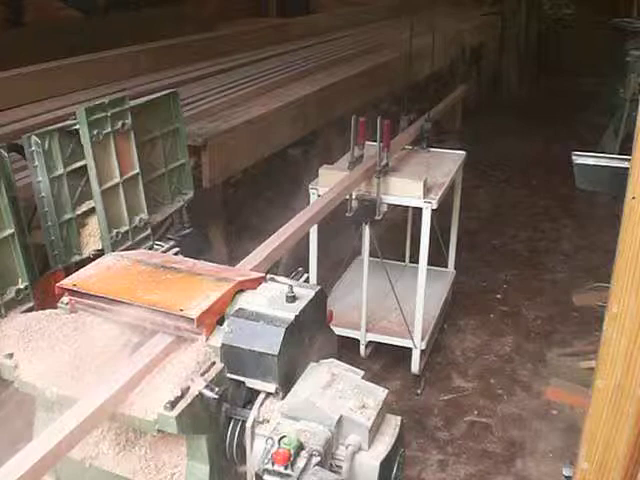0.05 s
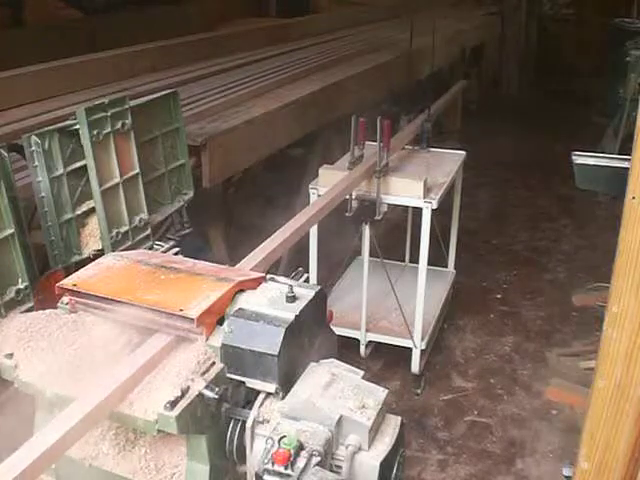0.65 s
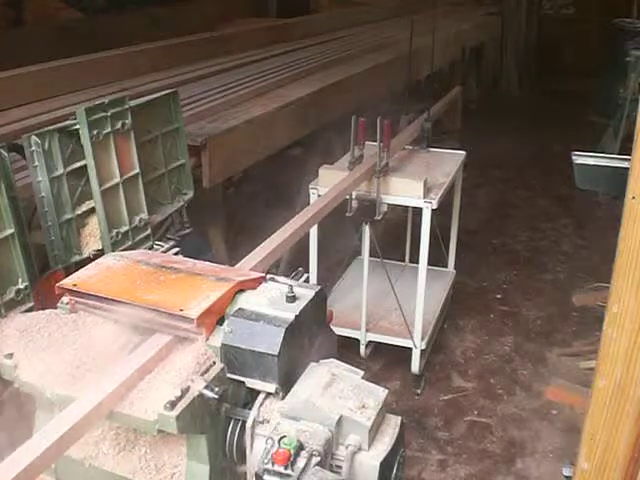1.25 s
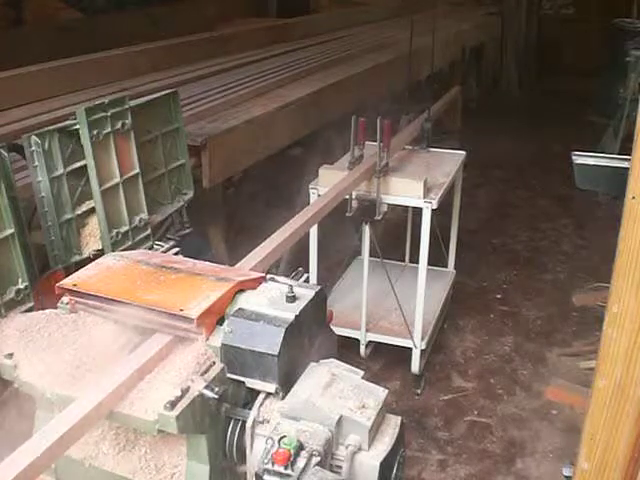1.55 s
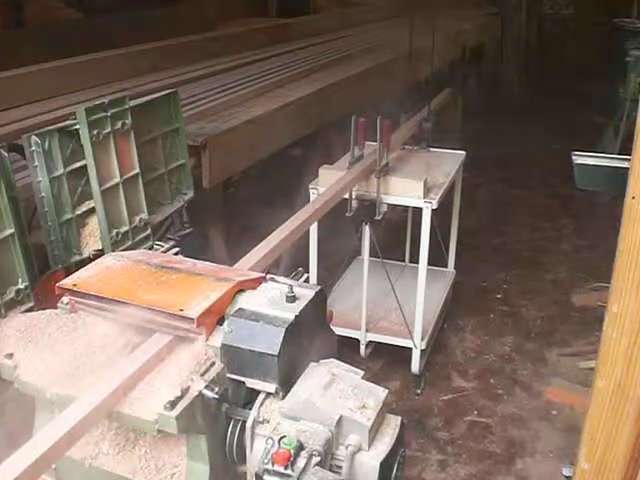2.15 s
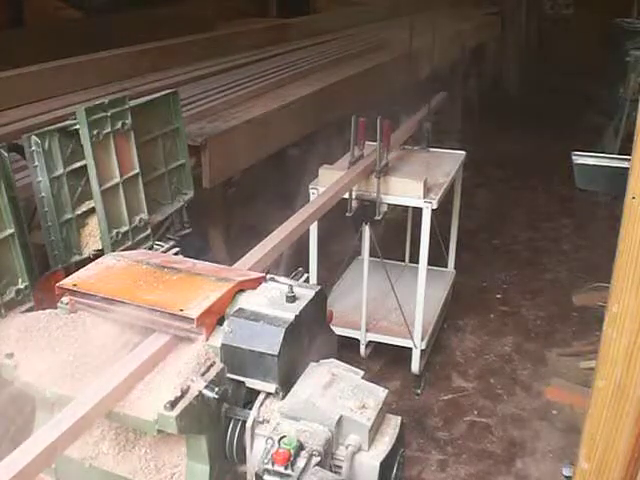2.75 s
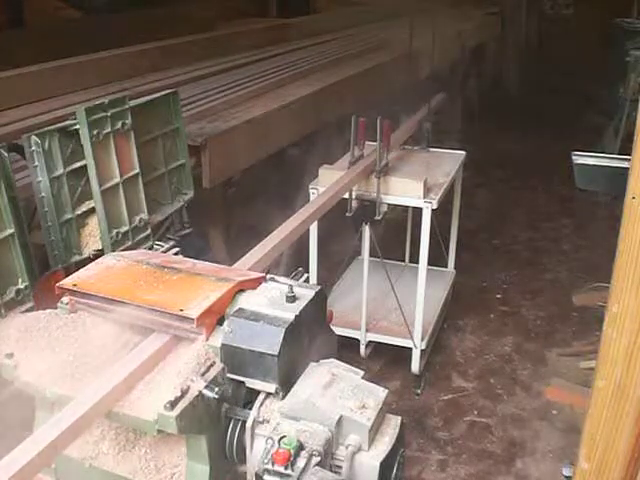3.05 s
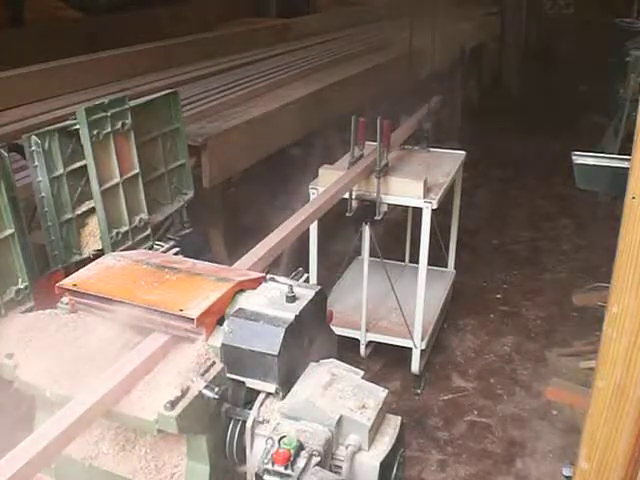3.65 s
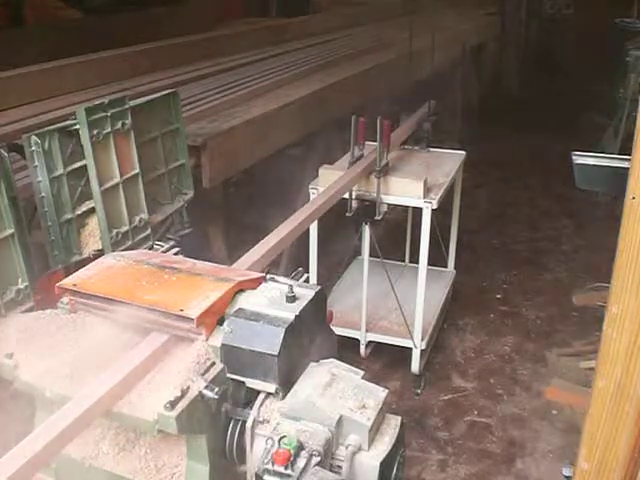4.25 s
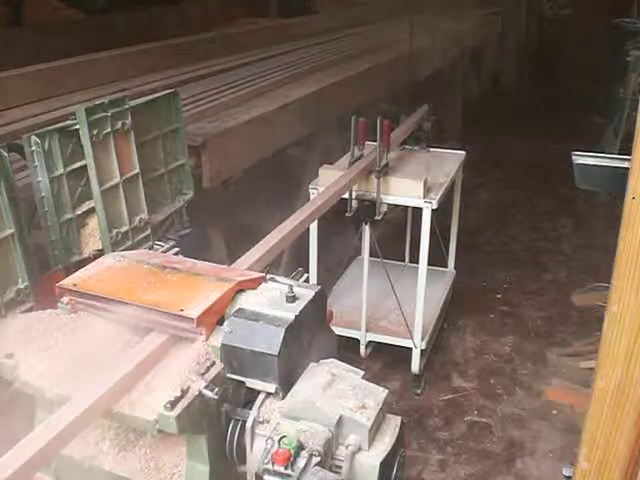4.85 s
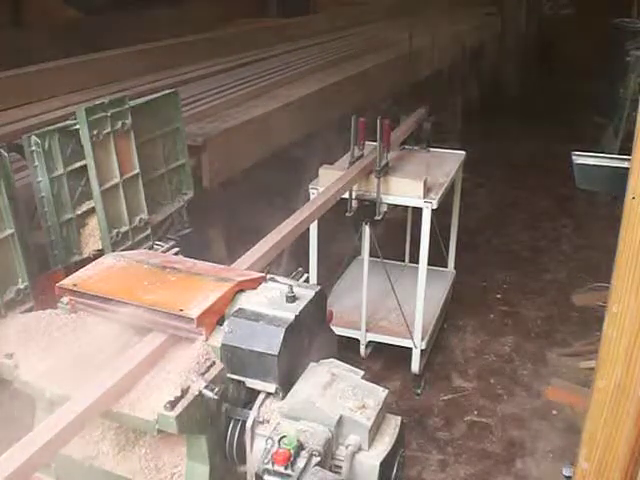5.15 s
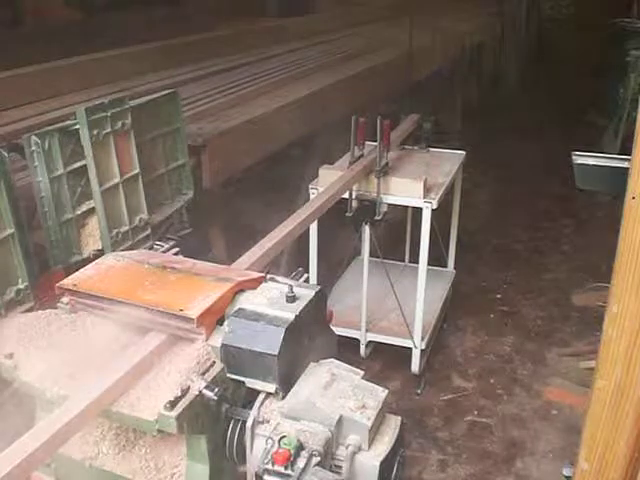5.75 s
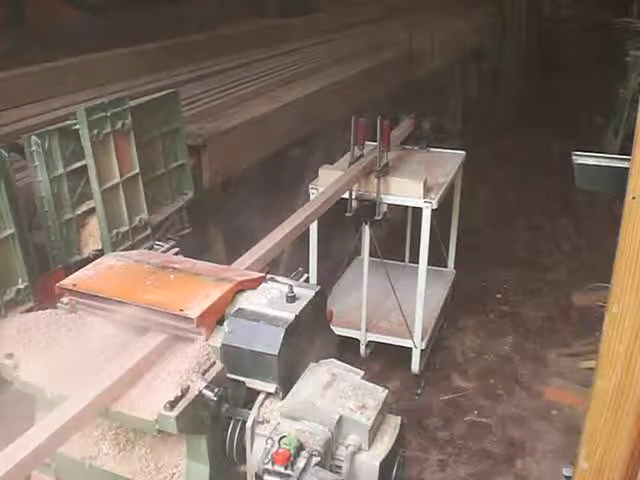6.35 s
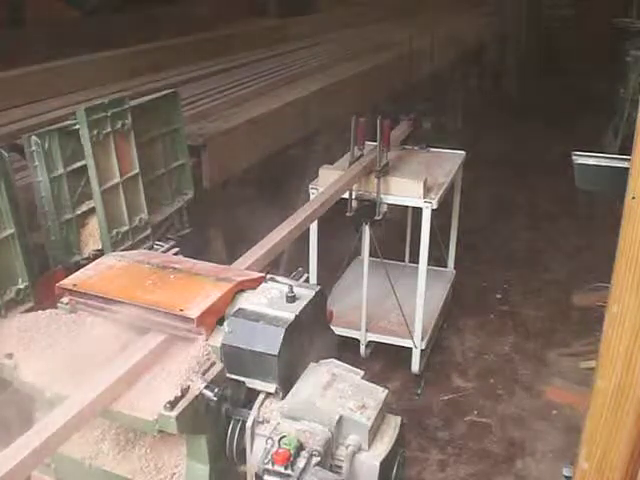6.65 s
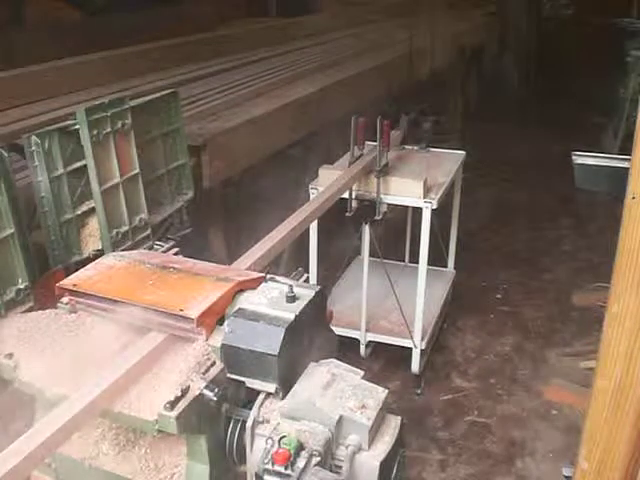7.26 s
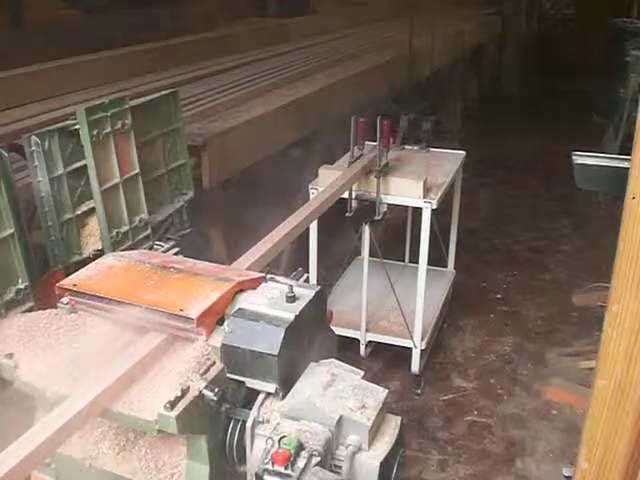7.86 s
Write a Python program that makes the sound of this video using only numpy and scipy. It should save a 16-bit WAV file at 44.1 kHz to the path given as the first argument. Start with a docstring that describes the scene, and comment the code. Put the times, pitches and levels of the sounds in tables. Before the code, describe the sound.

A motorised planer is already cutting a wooden strip at the start, heard from one fixed microphone beside it in a workshop. The rapid knife strikes fuse into a throbbing drone and a high, buzzing whine. Air rushes around the cutter, tearing fibres and flying chips add a bright hiss, and a faint motor hum lies underneath. Within the first second the strip begins to squeal on and off, with a clear, high squeal at about 1 second. Single tones swell and fade within the drone, and rough grain brings brief rasps. Squeals and rasps are strongest around 4 seconds, return in shorter bursts between about 5.3 and 6.2 seconds, and peak again just after 7 seconds. The machine's pitch and overall loudness stay nearly constant, and the cut is still going at the end, at about 8 seconds.

```python
"""A workshop, one fixed microphone beside a running planer; a wooden strip is already feeding through.
From the start the motor hums, air rushes round the two-knife cutter block, and the knife strikes
fuse into a throbbing drone and a buzzing whine, each strike tearing off a burst of chips.
Within the first second the strip starts to squeal on and off, single tones sing out and cross grain rasps.
Squeals and rasps are strongest around 4 s and just after 7 s; the cut runs on to the end."""
import sys
import numpy as np
from scipy import signal
from scipy.fft import rfft, irfft, next_fast_len
from scipy.io import wavfile
from scipy.ndimage import uniform_filter1d

SR = 44100
rng = np.random.default_rng(int(sys.argv[2]) if len(sys.argv) > 2 else 0)


def transcribe(u):
    """Save the signal u as a 16-bit wav file named by the first command-line argument.

    u: samples, shape (n,) or (channels, n), limited to [-1, 1]; the rate is SR.
    q: integer samples, one column per channel.
    """
    v = np.clip(np.atleast_2d(u).T, -1, 1)
    q = np.round(v * 32767).astype(np.int16)
    wavfile.write(sys.argv[1], SR, q)


N = 347949
TIME = np.arange(N) / SR

# Steady tones of the motor and drive. Each row: frequency in Hz, level in dB.
MOTOR_TONES = [(208, -65), (241, -58.5), (257, -53.5), (385, -60), (449.6, -52), (674.7, -62)]
# Air whirled round the block. Each row: frequency in Hz, relative level in dB.
AIR_SPECTRUM = [(25, -39), (70, -12), (170, -10), (260, -10), (410, 2), (470, -3), (600, 0.5), (760, -5),
                (1050, 1), (1800, -2), (2500, -9.5), (4400, -1.5), (7000, -13), (15500, -17)]
# The block sags a little under load. Each row: time in seconds, turns per second.
BLOCK_SPEED = [(0.0, 104.37), (1.16, 104.38), (1.28, 104.04), (1.72, 103.97), (1.9, 104.35), (2.1, 104.0),
               (2.58, 104.33), (3.6, 104.53), (3.7, 104.3), (4.6, 104.59), (5.42, 104.08), (5.52, 104.38),
               (5.82, 104.15), (5.92, 104.42), (6.22, 104.24), (6.72, 104.79), (7.6, 104.23),
               (7.89, 104.55)]
# Slow changes along the strip. Each row: time in seconds, knife bite and chip spray in relative dB.
CUT_LEVELS = [(0.0, -27.5, -34.5), (0.6, -24, -32.5), (0.75, -27.5, -33.5), (1.5, -25.5, -34),
              (2.25, -23.2, -31), (3.75, -26.5, -33.5), (4.65, -25.5, -34.5), (4.8, -26.5, -34.5),
              (5.25, -26, -34), (5.4, -23.5, -34.5), (5.55, -25.5, -34), (5.7, -22.5, -35.5),
              (5.85, -28, -39), (6.0, -25, -35), (6.9, -26.5, -34), (7.89, -26, -34)]
# Tones from both knives alike. Each row: order (multiple of the turning rate), level in dB.
EVEN_ORDERS = [(2, -56), (4, -34), (6, -29.5), (8, -40.5), (10, -32), (12, -35.5), (14, -40), (16, -40.5),
               (18, -33), (20, -36.5), (22, -41), (24, -42), (26, -47), (28, -38.5), (30, -32), (32, -29.5),
               (34, -40), (36, -35), (38, -41), (40, -41), (42, -32.5), (44, -42), (46, -39), (48, -35),
               (50, -38.5), (52, -40.5), (54, -39.5), (56, -36), (58, -37), (60, -35.5), (62, -35),
               (64, -42.5), (68, -47.5), (70, -46), (74, -40.5), (80, -47.5), (84, -42.5), (88, -42),
               (92, -56), (96, -48.5), (102, -46.5), (110, -54.5), (150, -57.5)]
# Tones from one knife standing prouder than the other. Each row: order, level in dB.
ODD_ORDERS = [(1, -48.5), (3, -58.5), (7, -48.5), (9, -52), (11, -45), (15, -47.5), (21, -55), (27, -47.5),
              (31, -43.5), (37, -48.5), (43, -48), (51, -57), (59, -54), (69, -61), (75, -62), (93, -77),
              (151, -64)]
# The drone's two main tones. Each row: time in seconds, orders 4 and 6 in relative dB.
DRONE_LEVELS = [(0.0, -31, -28), (1.5, -35.5, -30), (2.55, -36.0, -26.9), (2.7, -41, -28),
                (3.75, -32.5, -28), (4.65, -30.5, -30.5), (5.7, -30, -29.5), (5.85, -33, -33),
                (6.45, -30, -31), (7.89, -39, -30.5)]
# Those two tones beat. Each row: order, time of one dip in seconds, depth 0-1 at mean level.
DRONE_BEATS = [(4, 1.003, 0.16), (6, 2.146, 0.05)]
# Fibres tearing. Each row: frequency in Hz, relative level in dB.
TEARING_SPECTRUM = [(800, -15.5), (2500, -1), (3300, -5.5), (4000, -6), (4500, -30), (5300, -19), (6200, 1),
                    (7200, -13), (7800, -4.5), (9700, -6.5), (15500, -7.5)]
# Chips spraying over the bed. Each row: frequency in Hz, relative level in dB.
SPRAY_SPECTRUM = [(7000, -33), (11000, 0), (15500, -1)]
# The strip squeals. Each row: middle and half length in seconds, rise in dB, pitch it pulls to in Hz.
STRIP_SQUEALS = [(.17, 0.061, 3, 3300), (0.603, .08, 2.5, 3340), (1.042, 0.15, 7.5, 3180),
                 (1.73, 0.14, 2, 3280), (2.587, 0.11, 3.5, 3260), (2.88, 0.12, 3.5, 3440),
                 (3.824, 0.097, 7, 3000), (4.02, 0.15, 7, 2990), (4.24, 0.15, 5, 3280),
                 (4.62, 0.088, 4.5, 3120), (5.413, 0.12, 4, 3180), (5.79, 0.13, 6.5, 3160),
                 (6.21, .055, 6, 3150), (6.53, 0.07, 1, 3320), (6.95, 0.072, 2, 3220),
                 (7.38, 0.17, 8.5, 3180), (7.776, 0.14, 4.7, 3100)]
# Single tones sing out as the strip moves on.
# Each row: middle and half length in seconds, order, rise in dB.
TONE_FLARES = [(.45, 0.28, 12, 5.5), (.8, 0.2, 18, 6.5), (1.55, .13, 18, 5.5), (1.95, 0.99, 48, 5),
               (2.15, 0.17, 18, 8.5), (2.198, 0.19, 20, 6.5), (2.385, 0.2, 12, 7), (2.42, 0.34, 8, 6.5),
               (2.65, 0.22, 42, 3), (3.38, 0.21, 20, 9.5), (3.81, .33, 18, 11.5), (3.84, .1, 16, 9),
               (3.88, 0.26, 20, 9), (3.954, .35, 10, 3), (5.166, 0.69, 12, 6.5), (5.204, 0.35, 20, 9),
               (5.38, .08, 48, 5), (5.503, 0.27, 18, 6), (5.646, 0.083, 20, 8), (6.4, 1, 20, 6.5),
               (6.55, 0.077, 36, 6), (4.95, 0.36, 8, 5), (7.13, 0.14, 8, 6), (7.147, 0.61, 18, 8.5),
               (7.8, .25, 20, 6.5)]
# Cross grain rasps; soft wood (below 0) cuts quietly.
# Each row: middle and half length in seconds, rasp in dB, of which each layer takes a share.
GRAIN_PATCHES = [(0.502, 0.079, 0.5), (1.31, 0.087, 0.8), (1.47, .06, -1.8), (1.647, 0.077, 2),
                 (2.56, .08, 0.9), (3.404, 0.06, 1.5), (3.818, 0.12, 3), (4.237, 0.11, 2), (5.31, 0.063, 3),
                 (5.455, 0.044, -2), (6.16, 0.054, 1.5), (6.753, .07, -0.5), (7.202, 0.1, 4),
                 (7.78, .05, 1.5)]

SQUEAL_HZ, SQUEAL_WIDTH_HZ = 3170, 500  # the strip's resonance
ECHO_S = .00066  # the machine bed throws each strike back


def amp(db):
    """Decibels to gain."""
    return 10 ** (np.asarray(db) / 20)


def unit(x):
    """Scales to rms 1."""
    return x / np.sqrt(np.mean(abs(x) ** 2) + 1e-20)


def relative(db):
    """A level curve in dB, relative to its mean power."""
    return db - 10 * np.log10(np.mean(amp(db) ** 2))


def curves(rows):
    """Each column of a timed table, at every sample."""
    times, *columns = np.transpose(rows)
    return [np.interp(TIME, times, column) for column in columns]


def bump(middle_s, half_s):
    """A slightly flat-topped bell that reaches 1 at middle_s."""
    return np.exp(-np.minimum(abs((TIME - middle_s) / half_s), 10) ** 2.3)


def wander(rate_hz):
    """A smooth random curve of rms 1 that changes at about the given rate."""
    hz = np.fft.rfftfreq(2048, TIME[-1] / 2048)
    slow = irfft(rfft(rng.standard_normal(2048)) / (1 + (hz / rate_hz) ** 2))
    return np.interp(TIME, np.linspace(0, TIME[-1], len(slow)), unit(slow))


def colour(x, spectrum):
    """Gives x a spectrum, at rms 1."""
    size = next_fast_len(N)
    hz, db = np.transpose(spectrum)
    gain = amp(np.interp(np.log(np.fft.rfftfreq(size, 1 / SR) + 1), np.log(hz), db))
    return unit(irfft(rfft(x, size) * gain, size)[:N])


def order_db(order):
    """Base level of one multiple of the turning rate."""
    return np.interp(order, *np.transpose(ODD_ORDERS if order % 2 else EVEN_ORDERS))


def motor_hum(waver_db=2, drift_rad=0.32):
    """Faint wavering tones of the motor and drive, underneath the cut."""
    hum = np.zeros(N)
    for hz, db in MOTOR_TONES:
        level = amp(db + waver_db * wander(5.8))
        hum += level * np.cos(2 * np.pi * hz * TIME + drift_rad * wander(4))
    return np.sqrt(2) * hum


def air_rush(turns, bite, rasp, level_db=-31.5, throb=0.21, gust_db=0.44):
    """Air and shavings pulse as each knife passes the table lip, louder in cross grain."""
    pulse = 1 + throb * np.cos(4 * np.pi * turns)
    rush = colour(rng.standard_normal(N) * pulse, AIR_SPECTRUM)
    return rush * amp(level_db + 0.4 * bite + 0.85 * rasp + gust_db * wander(7.5))


def knife_drone(turns, bite, swells, waver_db=3, tremble_db=0.91, flutter_rad=0.075):
    """The low orders of the strikes, their phases scrambled by the room on the way to the microphone."""
    drone = np.zeros(N)
    for order in range(1, 25):
        if order in swells:
            swell = swells[order]
        else:  # the rest follow the bite and order 6
            swell = 0.85 * (bite + swells[6]) / 2 + waver_db * min(order / 14, 1) * wander(0.62)
        level = amp(order_db(order) + swell + tremble_db * wander(18))
        drone += level * np.cos(2 * np.pi * (order * turns + rng.random()) + flutter_rad * wander(14))
    return np.sqrt(2) * drone


def strip_resonance(hz):
    """How far a frequency lies inside the strip's resonance, 0-1."""
    return 1 / (1 + (abs(hz - SQUEAL_HZ) / SQUEAL_WIDTH_HZ) ** 4)


def knife_whine(turns, bite, chips, squeal, centre_hz, swells,
                echo=0.91, echo_cutoff_hz=9000, crisp_hz=9000, focus_hz=200, waver_db=1.52):
    """The high orders bunch into a short rasp at each strike, with its echo off the bed."""
    whine = np.zeros(N)
    turn_hz = np.mean(np.array(BLOCK_SPEED)[:, 1])
    drifts = [wander(1.4) + 0.27 * wander(16) for _ in range(24)]
    for order in range(25, 153):
        hz = order * turn_hz
        ring = strip_resonance(hz)
        treble = 1 / (1 + (crisp_hz / hz) ** 6)
        bounce = 1 + echo / (1 + (hz / echo_cutoff_hz) ** 4) * np.exp(-2j * np.pi * hz * ECHO_S)
        # the strip's ringing and the knife's travel through the wood draw the strike out
        ring_lag = np.arctan((hz - SQUEAL_HZ) / SQUEAL_WIDTH_HZ) - np.pi / 2
        travel_phase = 0.24 * ((hz - crisp_hz) / SQUEAL_HZ) ** 2
        # room paths shift each partial's level and phase as the wood moves
        drift_a, level_drift, drift_b = (drifts[i] for i in rng.permutation(len(drifts))[:3])
        scatter = (0.6 * (1 - treble) + 0.38 * treble) * (drift_a + drift_b) / np.sqrt(2)
        phase = np.angle(bounce) - ring_lag + travel_phase + scatter
        cut_db = (1 - treble) * bite + treble * chips + waver_db * level_drift
        swell = ring * squeal + (1 - ring) * cut_db
        if ring > .1:  # the resonance slides and favours the nearest partial
            favour = -10 * np.log10(1 + ((hz - centre_hz) / focus_hz) ** 2)
            swell += ring * (favour - favour.mean())
        level = amp(order_db(order) + swells.get(order, swell))
        whine -= level * np.cos(2 * np.pi * order * turns + phase)
    return np.sqrt(2) * whine


def tearing_fibres(turns, bite, chips, squeal, level_db=-31.5, spray_db=-40, decay=0.072, echo=0.56):
    """Each strike tears fibres: a burst of noise and its duller echo, over a spray of flying chips."""
    age = (2 * turns + .02) % 1  # age and decay are in strike intervals
    bursts = np.exp(-age / decay) * rng.standard_normal(N)
    bounced = uniform_filter1d(np.interp(TIME - ECHO_S, TIME, bursts), size=3)
    hiss = np.sqrt(0.041) * rng.standard_normal(N)
    tearing = colour(bursts + echo * bounced + hiss, TEARING_SPECTRUM)
    spray = amp(spray_db + chips) * colour(rng.standard_normal(N), SPRAY_SPECTRUM)
    hz, frame_s, bands = signal.stft(tearing, SR, nperseg=256)
    ring = strip_resonance(hz)[:, None]
    treble = np.clip((hz - 6000) / 4000, 0, 1)[:, None]
    bite, chips, squeal = (np.interp(frame_s, TIME, curve) for curve in (bite, chips, squeal))
    cut_db = (0.5 - treble) * bite + treble * chips
    # a squeal is mostly tone, so the noise rises only a little with it
    bands *= amp(ring * squeal / 3 + (2.5 - ring) * cut_db)
    return amp(level_db) * signal.istft(bands, SR)[1][:N] + spray


def strip_squeal(bite, rest_hz=3266, slide_hz=50, waver_db=1.15):
    """Level in dB and centre in Hz of the strip's ringing: each squeal raises it and pulls its pitch."""
    level = 0.28 * bite + waver_db * wander(2.3)
    pull, weight = 0, 1
    for middle_s, half_s, db, hz in STRIP_SQUEALS:
        rise = db * bump(middle_s, half_s)
        level += rise
        pull += rise * (hz - rest_hz)
        weight += rise
    return relative(level), rest_hz + pull / weight + slide_hz * wander(3)


def tone_swells(bite, rasp, beat_hz_per_order=0.625, low_waver_db=1.2, high_waver_db=1.35):
    """Level changes in dB of the strongest orders: the two lowest beat, the others flare up."""
    swells = {}
    fourth, sixth = (relative(level + 0.78 * rasp) for level in curves(DRONE_LEVELS))
    for (order, dip_s, depth), level in zip(DRONE_BEATS, (fourth, sixth)):
        depth = np.clip(depth * amp(-2 * level), 0, .7)  # the louder the tone, the shallower its beat
        beat = 1 - depth * np.exp(2j * np.pi * order * beat_hz_per_order * (TIME - dip_s))
        swells[order] = level + 20 * np.log10(abs(beat))
    for middle_s, half_s, order, db in TONE_FLARES:
        if order not in swells:
            if order < 25:  # in the drone
                slow = 0.42 * sixth + low_waver_db * wander(2.2)
            else:  # in the whine
                slow = 0.55 * bite + high_waver_db * wander(3)
            swells[order] = slow + 0.3 * rasp
        swells[order] += db * bump(middle_s, half_s)
    return {order: relative(level) for order, level in swells.items()}


def grain_rasp():
    """The cut gets louder through cross grain and quieter through soft wood."""
    return sum(db * bump(middle_s, half_s) for middle_s, half_s, db in GRAIN_PATCHES)


def scene(whine_db=-0.5, strike_spread_db=0.62, jitter_s=3e-6, uneven_db=0.44):
    """The planer at the microphone, in mono: one block drives the cut, no two strikes equally hard."""
    turn_hz, = curves(BLOCK_SPEED)
    turns = np.cumsum(turn_hz) / SR
    rasp = grain_rasp()
    uneven = uneven_db * wander(5)
    bite, chips = curves(CUT_LEVELS)
    bite = relative(bite + 0.64 * rasp + uneven)
    chips = relative(chips + 0.7 * rasp + uneven)
    squeal, centre_hz = strip_squeal(bite)
    swells = tone_swells(bite, rasp)
    strike_number = (2 * turns + .25).astype(int)
    hardness, earliness = rng.standard_normal((2000, 2))[strike_number].T
    force = uniform_filter1d(amp(strike_spread_db * hardness), size=20)
    jittered_turns = turns + jitter_s * turn_hz * uniform_filter1d(earliness, size=20)
    whine = amp(whine_db) * knife_whine(jittered_turns, bite, chips, squeal, centre_hz, swells)
    cutting = force * (whine + tearing_fibres(turns, bite, chips, squeal))
    return (cutting + knife_drone(turns, bite, swells) + air_rush(turns, bite, rasp) + motor_hum())[None]


def record(dry, cutoff_hz=15780):
    """The recorder's band limit cuts the very top off the microphone signal."""
    lowpass = signal.firwin(801, cutoff_hz, window=("kaiser", 9), fs=SR)
    return signal.oaconvolve(dry, lowpass[None], "same")


dry = scene()
out = record(dry)
transcribe(out)
```